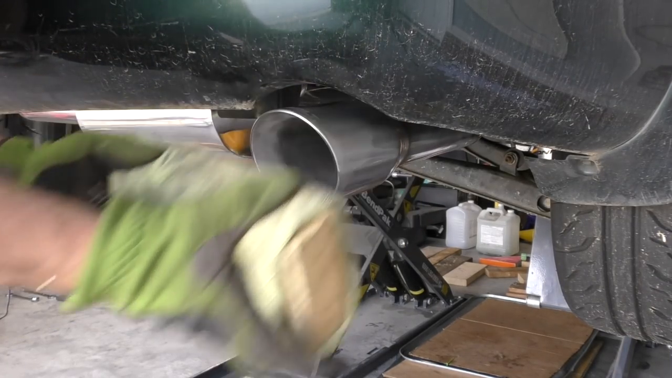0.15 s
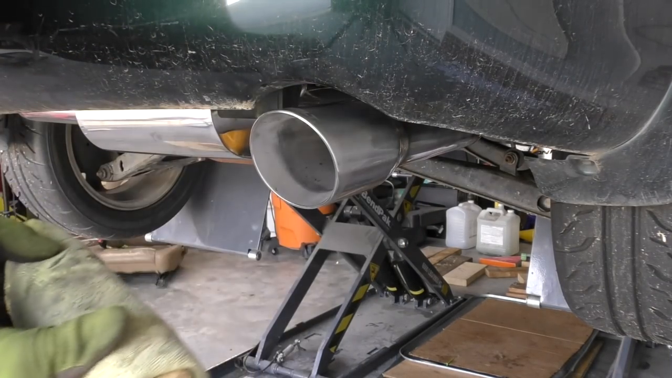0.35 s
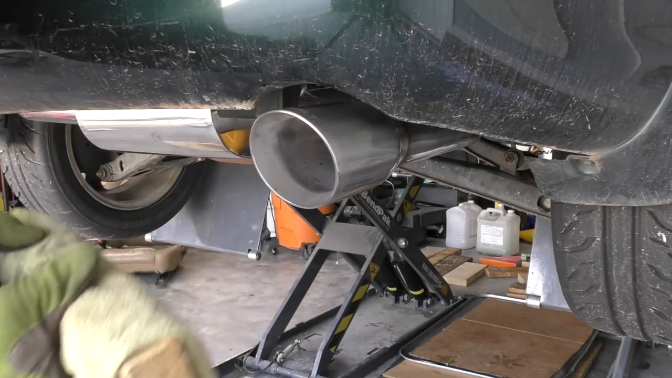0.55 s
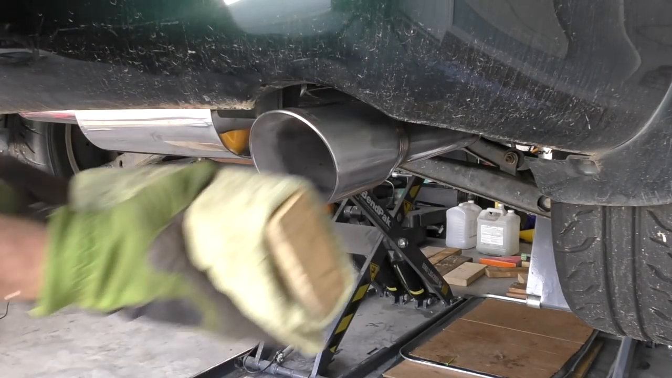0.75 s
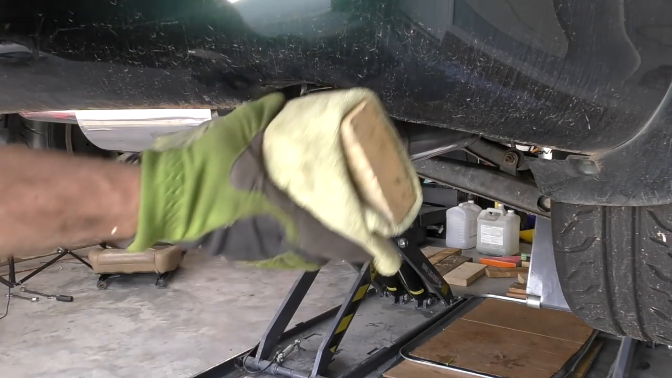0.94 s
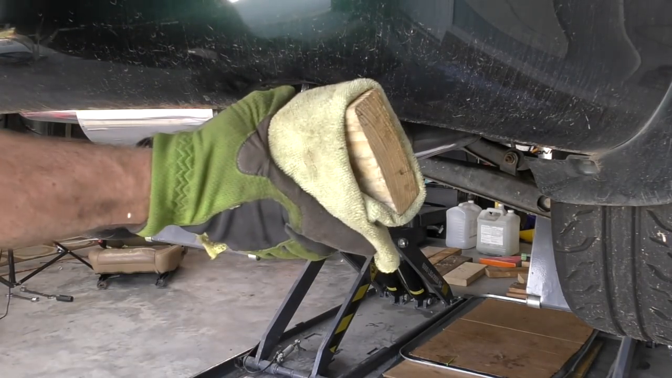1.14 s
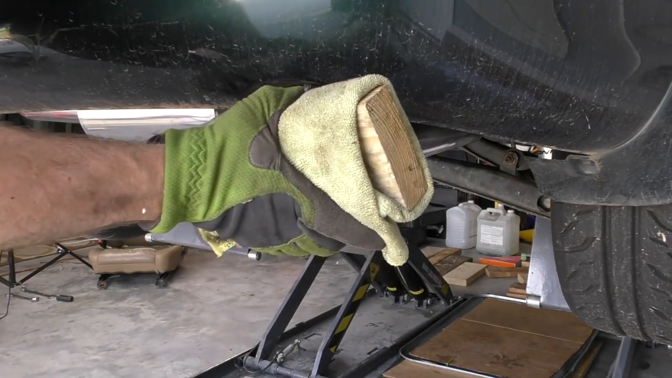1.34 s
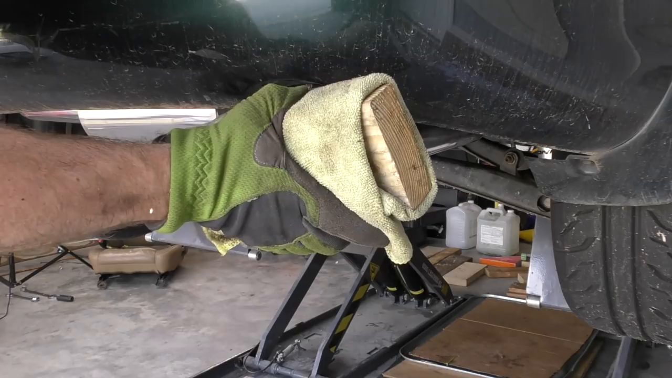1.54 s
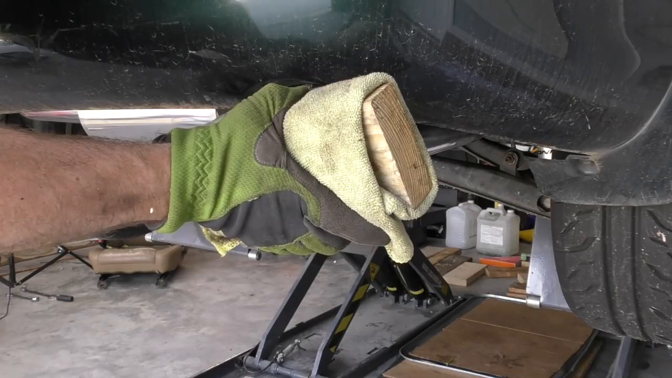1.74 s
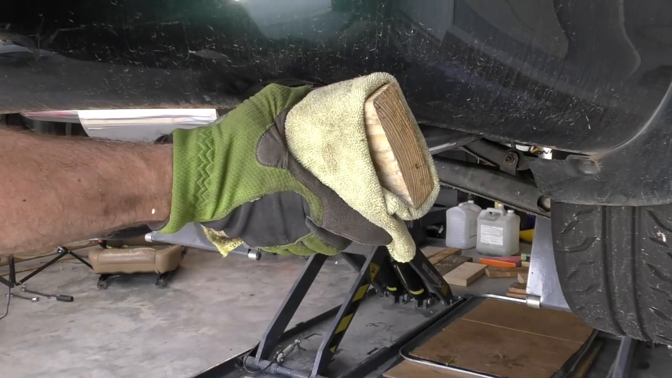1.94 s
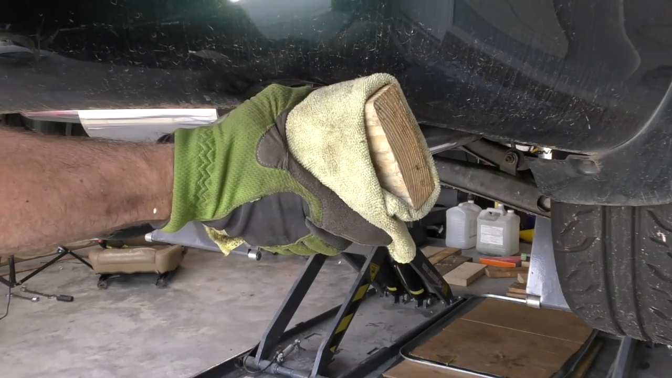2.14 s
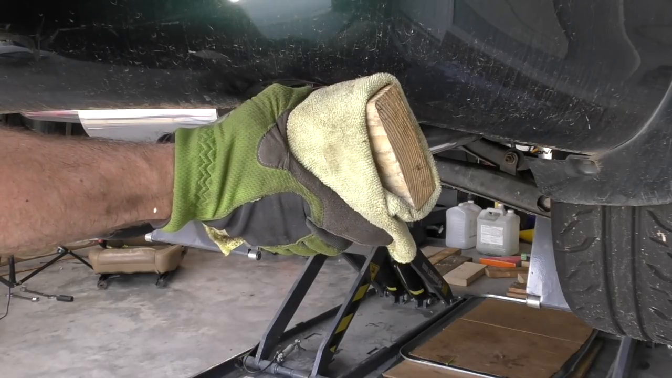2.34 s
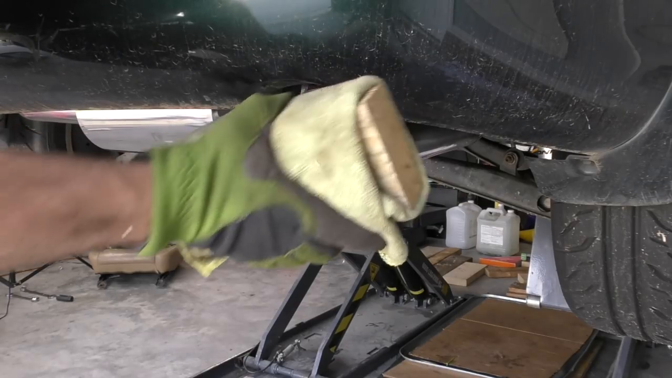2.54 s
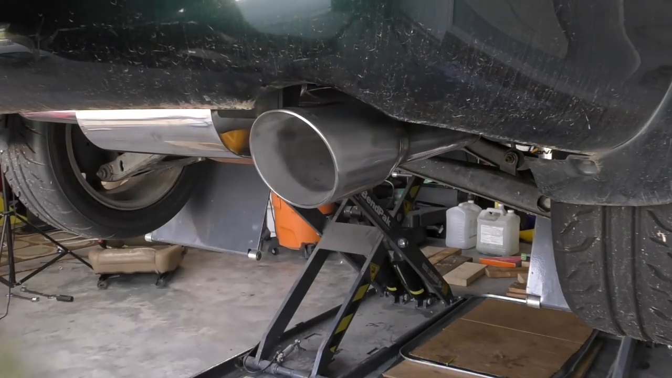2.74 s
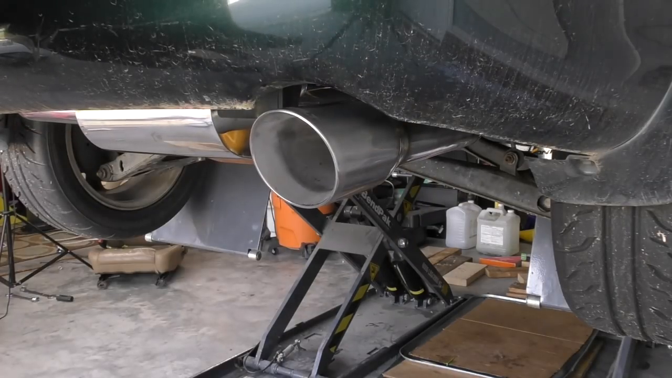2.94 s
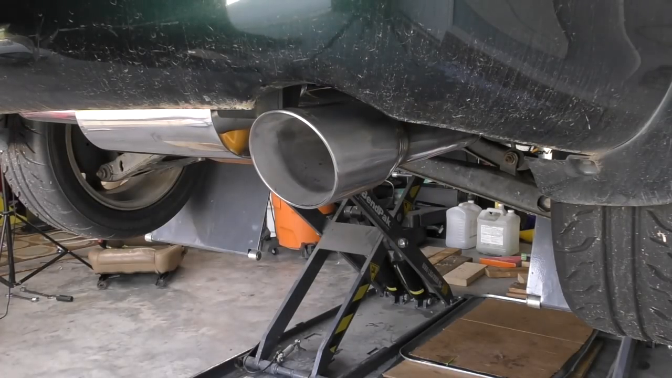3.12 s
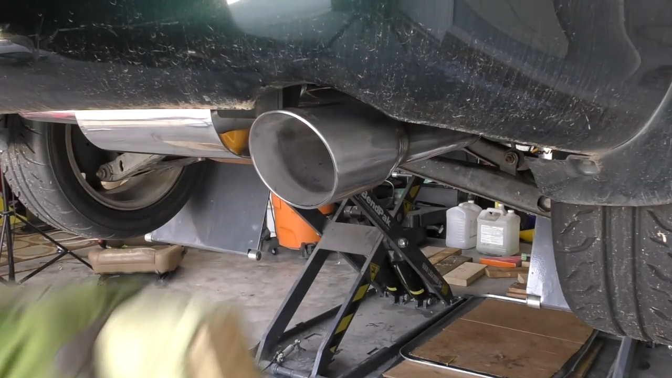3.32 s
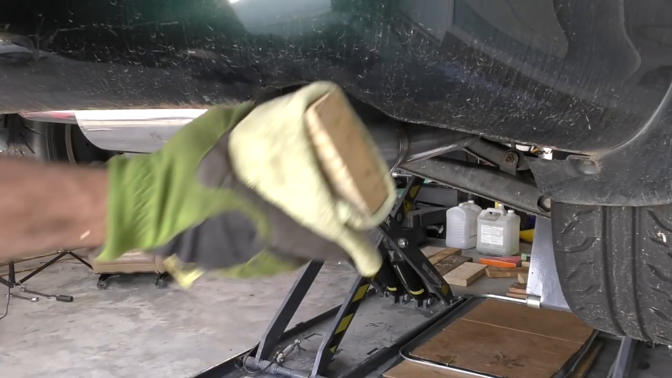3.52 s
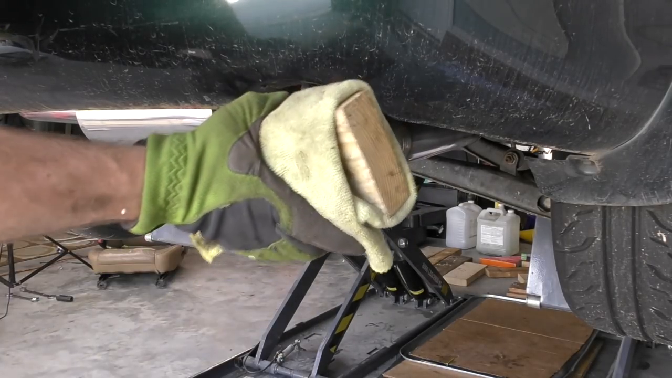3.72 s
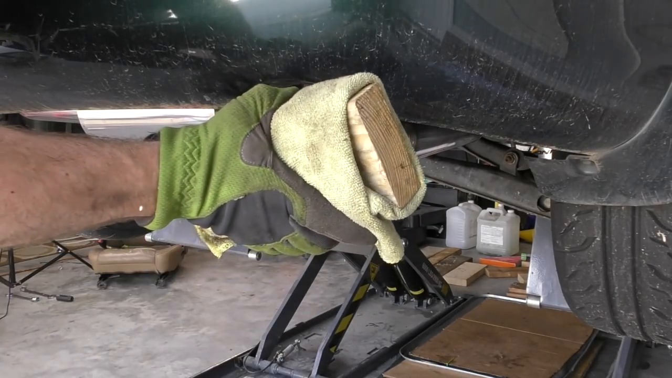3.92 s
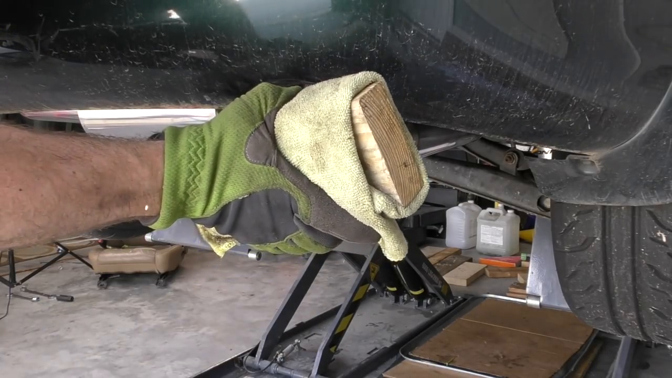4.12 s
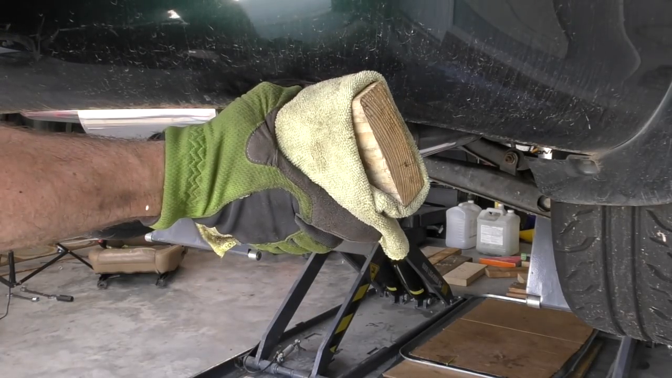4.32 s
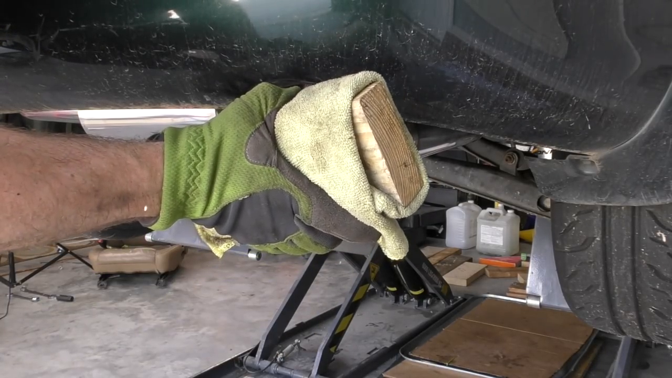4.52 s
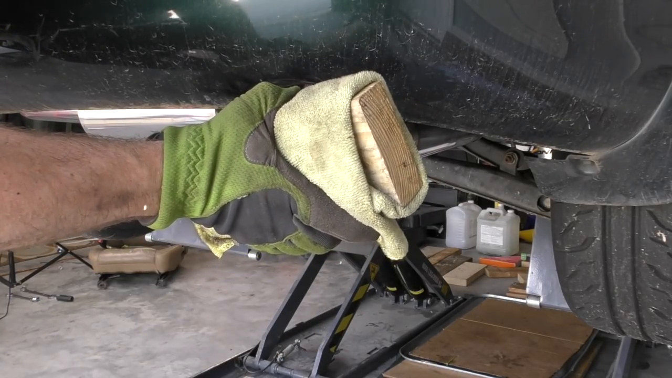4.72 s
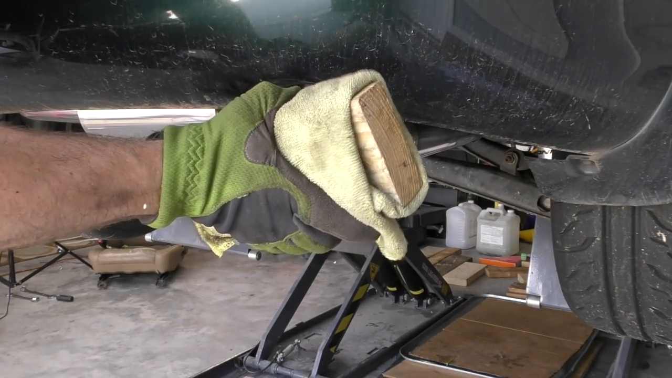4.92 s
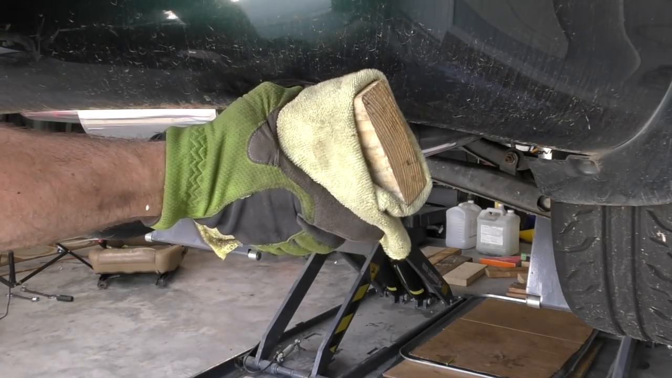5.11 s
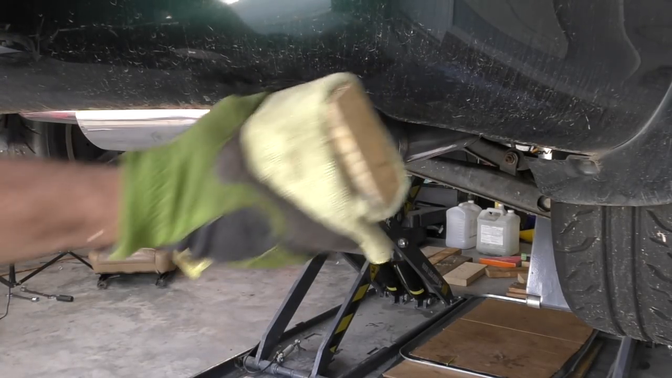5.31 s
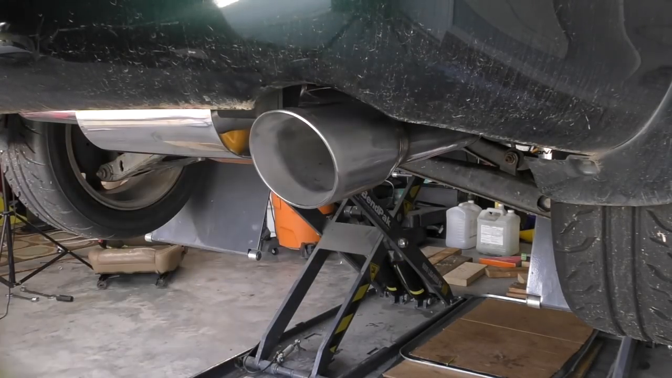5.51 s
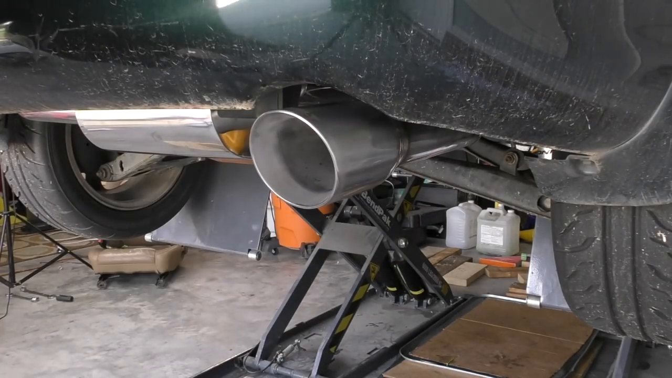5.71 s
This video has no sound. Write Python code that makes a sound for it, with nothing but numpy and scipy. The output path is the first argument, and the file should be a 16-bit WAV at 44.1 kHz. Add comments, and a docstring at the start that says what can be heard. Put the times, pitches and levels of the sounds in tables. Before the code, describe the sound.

Close tailpipe idle in a garage cuts in and out: sharp gas spits on release, low uneven boom, soft knock, then quiet muffled hush.

```python
"""In a garage under a raised car, close to the tailpipe: a four-cylinder engine idles near 1000 rpm.
Firing pulses ring the exhaust, one weak cylinder makes it lope, and each cylinder adds two barks.
A cloth-wrapped block is pulled off the pipe three times: trapped gas spits as noise bursts, then the pipe
booms, twice until the block knocks back on. While shut, a muffled throb of firing orders leaks by under
a fading noise rush. Farther off, the engine bay churns and whines; the walls answer spits and knocks."""
import sys
import numpy as np
from scipy import signal
from scipy.fft import rfft, irfft, next_fast_len
from scipy.io import wavfile
from scipy.ndimage import map_coordinates

SR = 44100
rng = np.random.default_rng(int(sys.argv[2]) if len(sys.argv) > 2 else 0)


def unload_audio(sound):
    """Save the sound as a 16-bit wav file, at the path given as the first command line argument."""
    columns = np.transpose(np.atleast_2d(sound))
    # keep every value between -1 and 1, then stretch to whole-number steps
    steps = np.round(np.clip(columns, -1, 1) * 32767)
    wavfile.write(sys.argv[1], SR, steps.astype(np.int16))


N = 258426

JITTER_S = .00004  # spread of the firing instants

# Colour of one firing through the open exhaust. Each row: frequency in Hz, relative level in dB.
FIRING_SPECTRUM = [(20, -57.5), (33, -26.5), (66, -19), (100, -13.5), (133, -13.5), (166, -2), (200, -22.5),
                   (229, 5), (266, -14.5), (299, -26), (333, -21), (400, -36.5), (560, -44.5), (1200, -88)]
# Colour of the weak cylinder's missing push. Each row: frequency in Hz, relative level in dB.
WEAK_SPECTRUM = [(60, -54.5), (135, -28.5), (160, -11), (205, -4.5), (226, 10), (250, -18.5), (330, -31.5),
                 (520, -37.5), (1500, -93.5)]
# Colour of the gas tumbling off the rim. Each row: frequency in Hz, relative level in dB.
TUMBLE_SPECTRUM = [(60, -28), (200, -9), (430, 4), (560, -6), (670, -10.5), (760, -11), (830, -32.5),
                   (2000, -60.5)]
# Strength of all that leaves the open mouth. Each row: time in seconds, gain in dB.
PUSH_STRENGTH = [(.9, -1), (2.7, -2), (3.6, -2.64), (5.4, -1.6)]


def exhaust(count):
    """Close by: firings ring the pipe as far as the block leaves it open."""
    beats = pulse_train(count, scatter_db=0.96, jitter=JITTER_S)
    # once in four firings a cylinder pushes too little: its suction wave nearly cancels the boom
    weak_count = (count - 1.137) / 4
    weak = pulse_train(weak_count, scatter_db=1.05, jitter=JITTER_S)
    boom = amp(-15.0) * ring(beats, FIRING_SPECTRUM) - amp(-24.0) * ring(weak, WEAK_SPECTRUM)
    # the gas tumbles a little as it leaves the rim, least just after the weak push
    tumble_db = -44 - 1.8 * np.cos(2 * np.pi * (weak_count - .07))
    tumble = amp(tumble_db) * noise(TUMBLE_SPECTRUM)
    return mouth() * amp(curve(PUSH_STRENGTH)) * (filtered(boom, chamber) + barks(count) + tumble)


# Two barks a cylinder, on blow-down and on the piston's push.
# Each row: place in the four-firing cycle in firings, ring in Hz, level in dB at the open mouth before PUSH.
CYLINDER_BARKS = [(0.332, 398.6, -47.5), (0.879, 358.5, -47), (1.377, 346, -48), (1.901, 367, -50.5),
                  (2.578, 455.5, -49.5), (3.281, 388, -45.5), (3.681, 441, -51), (3.981, 427, -53)]


def barks(count):
    """Every cylinder's gas takes its own way through the manifold and rings at its own pitch."""
    growl = np.zeros(N)
    for place, hz, db in CYLINDER_BARKS:
        resonance = [(hz * .4, -45), (hz * 0.82, -13), (hz, 0), (hz * 1.25, -13),
                     (hz * 1.6, -36), (hz * 1.9, -56), (hz * 5, -90)]
        pulses = pulse_train((count - place) / 4, scatter_db=1.3, jitter=JITTER_S)
        growl += amp(db) * ring(pulses, resonance, size=16384)
    return growl


CHAMBER_HZ, CHAMBER_WIDTH_HZ = 125.5, 34


def chamber(hz):
    """The muffler chamber lets everything through, but late around its resonance."""
    pole = CHAMBER_HZ ** 2 - hz ** 2 + 1j * hz * CHAMBER_WIDTH_HZ
    return np.conj(pole) / pole


# How the block is held on the pipe. Each row: lands in seconds, closing time in seconds, rests loose for
# seconds, lifts in seconds, opening time constant in seconds, time the grip takes to ease in seconds.
BLOCK_HOLDS = [(-.25, .03, .06, 0.041, .032, 0.11), (0.976, 0.047, .042, 2.535, 0.047, 0.62),
               (3.627, 0.046, 0.06, 5.275, 0.036, 0.17)]


def mouth():
    """Open share of the pipe mouth: shut in a short push, uncovered fast at first, then slower."""
    t = np.arange(N) / SR
    share = np.ones(N)
    for lands, closing, _, lifts, opening, _ in BLOCK_HOLDS:
        still_open = np.sin(np.pi / 2 * ramp((lands - t) / closing))
        reopened = 1 - np.exp(-np.maximum(t - lifts, 0) / opening)
        share *= still_open + reopened
    return share


# idle speed: it drifts down slowly and sags under back pressure
IDLE_RPM, DRIFT_RPM_PER_S, SAG_RPM, SAG_LAG_S = 1001, -1.5, 18, .2


def rpm():
    """Crank speed, dragged down with a lag while the pipe is shut."""
    keep = np.exp(-1 / (SAG_LAG_S * SR))
    back_pressure = signal.lfilter([1 - keep], [1, -keep], 1 - mouth())
    return IDLE_RPM + DRIFT_RPM_PER_S * np.arange(N) / SR - SAG_RPM * back_pressure


def firings():
    """Running count of firings: two for each turn of the crank."""
    return np.cumsum(rpm()) * 2 / 60 / SR - .75


SPIT_RISE_S = .005  # time constant of the swell
CHUFF_T60_S, HISS_T60_S = .09, .06
# Gas squeezed between block and rim. Each row: peak in seconds, chuff level in dB, hiss level in dB.
GAS_SPITS = [(.049, -46, -43), (0.067, -32.5, -43), (.096, -47.5, -73.5), (2.48, -61, -51),
             (2.508, -46.5, -33), (2.527, -15, -23.5), (2.558, -25, -35), (2.589, -31.5, -48),
             (5.217, -55, -41), (5.24, -24.5, -28), (5.27, -24.5, -32.5), (5.299, -29, -42.5),
             (5.331, -40, -68)]
# Colour of the low chuff. Each row: frequency in Hz, relative level in dB.
CHUFF_SPECTRUM = [(60, -18), (150, 9), (320, 11.5), (500, -0.5), (700, 4), (900, -1), (1120, 0), (1600, -6),
                  (2400, -8.5), (3600, -9), (4800, -13), (6500, -20), (16000, -53.5)]
# Colour of the hiss. Each row: frequency in Hz, relative level in dB.
HISS_SPECTRUM = [(800, -30), (2500, -6), (4500, -3), (7000, -4), (8500, -6.5), (10500, -3), (12500, -12.5),
                 (16000, -18)]


def spits():
    """At the rim: bursts through the gap swell quickly and die, a low chuff under a shorter hiss."""
    t = np.arange(N) / SR

    def shape(s, t60):
        swell = np.minimum(t - s, 0) / SPIT_RISE_S
        decay = np.log(1000) * np.maximum(t - s, 0) / t60
        return np.exp(swell - decay)

    chuff = sum(amp(db) * shape(s, CHUFF_T60_S) for s, db, _ in GAS_SPITS)
    hiss = sum(amp(db) * shape(s, HISS_T60_S) for s, _, db in GAS_SPITS)
    ragged = unit(amp(0.74 * wobble(300)))
    return (chuff * noise(CHUFF_SPECTRUM) + hiss * noise(HISS_SPECTRUM)) * ragged


# The wrapped block lands on the rim. Each row: start in seconds, level in dB.
BLOCK_TAPS = [(.937, -34.5), (0.951, -43.5), (0.97, -44), (1.009, -52), (3.585, -46.5), (3.597, -38.5),
              (3.613, -50.5), (3.629, -44.5)]
# Modes of the steel tip. Each row: frequency in Hz, level in dB.
TIP_MODES = [(2920, -32.5), (4330, -40), (7770, -47.5), (8820, -43.5), (13100, -42.5)]


def block():
    """Cloth-padded knocks on the rim; the steel tip rings briefly as the block first slips off."""
    t = np.arange(N) / SR

    def struck(s, t60):
        return ramp((t - s) / .0015) * amp(-60 * np.maximum(t - s, 0) / t60)

    knocks = sum(amp(db) * struck(s, 0.053) for s, db in BLOCK_TAPS)
    padded = noise([(200, -7), (450, -0.5), (700, 3.5), (950, -8),
                    (1200, -6.5), (1800, -30.0), (4000, -27.5), (12000, -51)])
    tip = sum(amp(db) * np.sin(2 * np.pi * hz * t) for hz, db in TIP_MODES)
    return knocks * padded + tip * struck(.066, 0.029)


# The throb with the block on. Each row: multiple of the firing rate, relative level in dB.
THROB_ORDERS = [(2, -20), (3, -7), (4, -10), (5, 0), (6, -11), (7, -12), (8, -19)]


def throb(count):
    """Muffled firing orders, smeared by underbody and walls so that each one drifts by itself."""
    orders = np.zeros(N)
    for k, db in THROB_ORDERS:
        level = amp(db + 2 * wobble(7))
        phase = 2 * np.pi * (k * count + rng.random()) + .3 * wobble(16)
        orders += level * np.sin(phase)
    return leak() * unit(orders)


# throb through the cloth (dB): pipe half covered, pipe open, block resting loose, pressed home, fully sealed
HALF_DB, OPEN_DB, LOOSE_DB, SEATED_DB, SEALED_DB = -26, -50.5, -33, -51, -77
# the hand presses the block home, the cloth beds in, back pressure builds up
PRESS_DB_PER_S, BED_DB_PER_S, BUILD_DB_PER_S = 606, 46, 10.5
# The block shifts on the rim and lets more of the throb by.
# Each row: middle in seconds, level in dB, half length in seconds (to 1/e).
BLOCK_SLIPS = [(1.201, -46, 0.0087), (2.476, -45, 0.011), (4.87, -67, 0.27)]


def leak():
    """Gain of the throb: strongest with the pipe half covered, then choked as the block is pressed home."""
    t, share = np.arange(N) / SR, mouth()
    gain = amp(HALF_DB) * np.sin(np.pi * share) ** 2 + amp(OPEN_DB) * share
    for lands, closing, loose, lifts, opening, _ in BLOCK_HOLDS:
        pressed = np.maximum(t - lands - loose, 0)
        seal = amp(LOOSE_DB - PRESS_DB_PER_S * pressed)
        seal += amp(SEATED_DB - BED_DB_PER_S * pressed)
        seal += amp(SEALED_DB + BUILD_DB_PER_S * pressed)
        gain += seal * ramp(1 + (t - lands) / closing) * ramp(1 + (lifts - t) / opening)
    return gain + sum(amp(db) * np.exp(-((t - s) / half) ** 2) for s, db, half in BLOCK_SLIPS)


# the rush fades while the pipe is shut and is fully back shortly after the lift
RUSH_DB, RUSH_FADE_DB_PER_S, RUSH_DEPTH_DB, RUSH_BACK_S = -54, 17, 17.5, 0.11
# Colour of the rush of gas. Each row: frequency in Hz, relative level in dB.
FLOW_SPECTRUM = [(100, -1), (400, 8.5), (900, -3.5), (1250, 3.5), (1380, -5), (1450, 6), (1540, -5.5),
                 (1630, 6), (1770, -2.5), (2600, -3.5), (4000, -9), (6000, -12), (8000, -19),
                 (10500, -24.5), (13000, -31.5), (16000, -46.5)]


def rush(count):
    """Soft gas noise, pulsing a little with the firings, fades under the block, returns as the grip eases."""
    t = np.arange(N) / SR
    choked_db = np.zeros(N)
    for lands, _, _, lifts, _, eases in BLOCK_HOLDS:
        fade_db = np.clip((t - lands) * RUSH_FADE_DB_PER_S, 0, RUSH_DEPTH_DB)
        choked_db += fade_db * ramp((lifts + RUSH_BACK_S - t) / eases)
    pulsing_db = 0.32 * np.cos(2 * np.pi * count) + 0.24 * wobble(4.1)
    return noise(FLOW_SPECTRUM) * amp(RUSH_DB - choked_db + pulsing_db)


# Colour of the engine bay. Each row: frequency in Hz, relative level in dB per Hz.
BAY_SPECTRUM = [(30, -42), (62, -32.5), (100, 1), (250, -5.5), (345, 3), (450, -10), (720, -9),
                (950, -14.5), (1230, -8.5), (1650, -10.5), (2000, -13), (2600, -14), (6000, -22.5),
                (8000, -27), (10500, -26.5), (15500, -40.5)]
# Belt and alternator whine. Each row: frequency in Hz before a 0.8 % rise and wavering, level in dB.
WHINE_TONES = [(344.5, -73), (490, -78), (1163, -81), (1260, -80), (1448, -78), (1588, -79), (1650, -79)]


def engine_bay(count):
    """Farther off: mechanical churn tied to the valve gear, with wavering accessory tones."""
    churn_swing = amp(.7 * np.cos(4 * np.pi * count) + 0.54 * wobble(14))
    churn = amp(-59.5) * noise(BAY_SPECTRUM) * churn_swing
    speed = unit(rpm())
    tones = np.zeros(N)
    for hz, db in WHINE_TONES:
        level = amp(db + 3.5 * wobble(9.7))
        turns = hz * np.cumsum(speed * (1.008 + .003 * wobble(13))) / SR
        tones += level * np.sin(2 * np.pi * turns)
    return churn + tones


# Decay of the garage. Each row: frequency in Hz, time to fall 60 dB in seconds.
GARAGE_DECAY = [(200, 0.17), (2000, 0.38), (12000, 0.11)]


def garage(x):
    """The walls and floor answer with a short diffuse tail: noise decaying at a rate set by frequency."""
    hz, t, z = signal.stft(rng.standard_normal(SR // 2), SR, nperseg=256)
    decay = amp(-60 * t / along(GARAGE_DECAY, hz)[:, None])
    tail = signal.istft(z * decay, SR, nperseg=256)[1]
    return signal.fftconvolve(x, tail / np.linalg.norm(tail))[:N]


def pulse_train(count, scatter_db, jitter):
    """One slightly uneven pulse each time the count passes a whole number; jitter in seconds."""
    at = np.flatnonzero(np.diff(np.floor(count)) > 0)
    size, slip = rng.standard_normal((len(at), 2)).T
    at = np.clip(np.round(at + slip * jitter * SR).astype(int), 0, N - 1)
    return np.bincount(at, amp(scatter_db * size), N)


def ring(pulses, spectrum, size=65536):
    """Pulses through a causal (minimum-phase) body of this spectrum with damped treble, at rms 1."""
    hz = np.fft.rfftfreq(size, 1 / SR)
    muffler_db = -40 * np.clip(np.log2((hz + 1) / 1500) / 3, 0, 1)
    cepstrum = irfft(np.log(amp(along(spectrum, hz) + muffler_db)))
    # folding the cepstrum forward in time makes the response causal
    cepstrum[1:size // 2] *= 2
    cepstrum[size // 2 + 1:] = 0
    response = irfft(np.exp(rfft(cepstrum)))[:size // 2]
    return unit(signal.fftconvolve(pulses, response)[:N])


def noise(spectrum):
    """Coloured noise of rms 1."""
    return unit(filtered(rng.standard_normal(N), lambda hz: amp(along(spectrum, hz))))


def filtered(x, response):
    """x times a gain that depends on frequency."""
    m = next_fast_len(N + SR // 2)
    return irfft(rfft(x, m) * response(np.fft.rfftfreq(m, 1 / SR)), m)[:N]


def wobble(rate):
    """A smooth random curve, rate knots a second."""
    return map_coordinates(rng.standard_normal(int(N * rate / SR) + 4), [np.arange(N) * rate / SR])


def curve(rows):
    """(s, value) rows as one value per sample."""
    return np.interp(np.arange(N) / SR, *np.transpose(rows))


def along(points, hz):
    """(Hz, value) points read on a log frequency axis."""
    f, v = np.transpose(points)
    return np.interp(np.log(hz + 1), np.log(f + 1), v)


def ramp(x):
    """Zero below 0, one above 1, straight between."""
    return np.clip(x, 0, 1)


def unit(x):
    """Scale to rms 1."""
    return x / np.sqrt(np.mean(x ** 2) + 1e-20)


def amp(db):
    """Decibels to gain."""
    return 10 ** (np.asarray(db) / 20)


def scene():
    """Tailpipe close by, engine farther off, the garage answering the spits and knocks."""
    count = firings()
    bursts = spits() + block()
    tailpipe = exhaust(count) + throb(count) + bursts + rush(count)
    return (tailpipe + amp(-18) * garage(bursts) + engine_bay(count))[None]


TOP_HZ = 15750


def record(dry):
    """The single microphone channel keeps nothing above its band limit."""
    return filtered(dry[0], lambda hz: hz < TOP_HZ)[None]


dry = scene()
out = record(dry)
unload_audio(out)
```